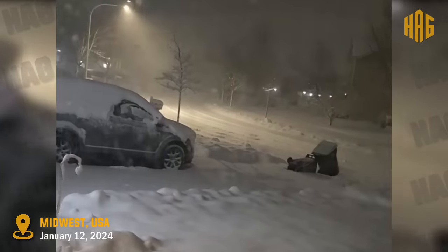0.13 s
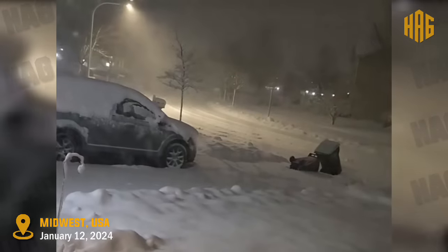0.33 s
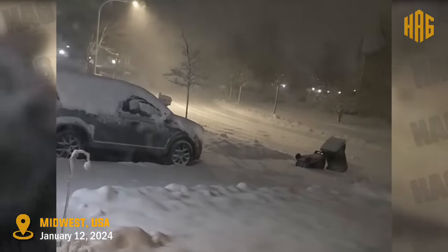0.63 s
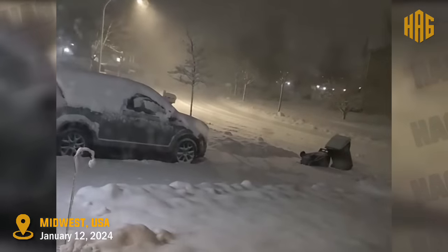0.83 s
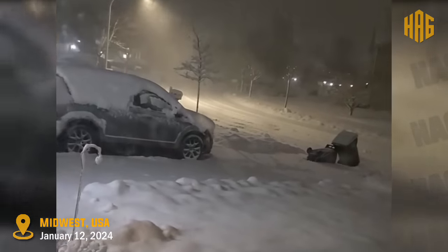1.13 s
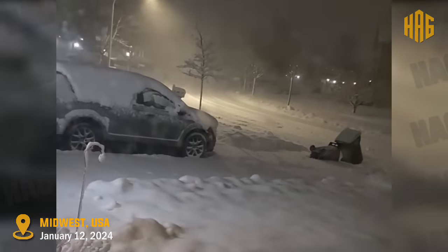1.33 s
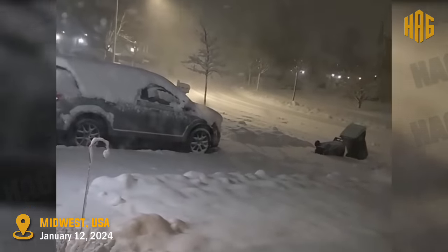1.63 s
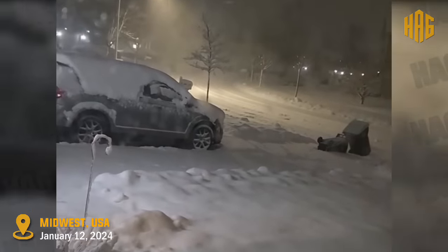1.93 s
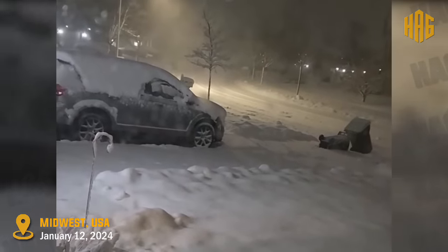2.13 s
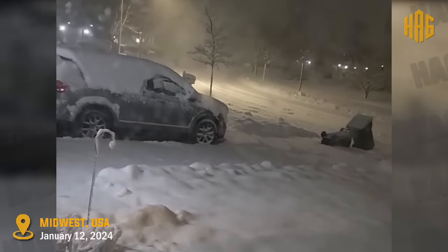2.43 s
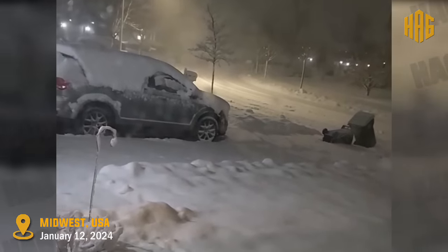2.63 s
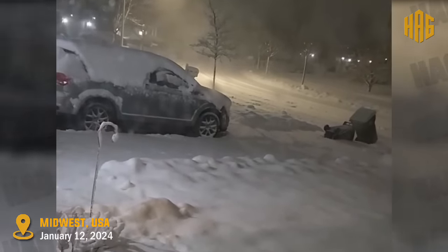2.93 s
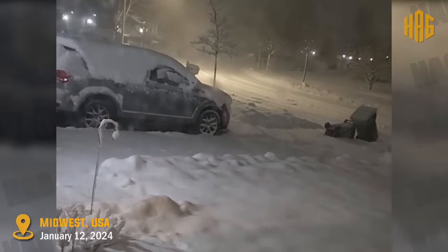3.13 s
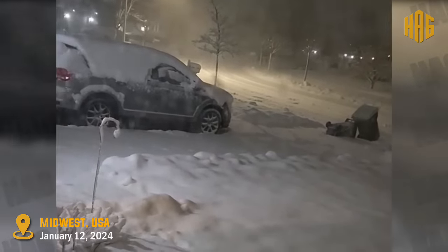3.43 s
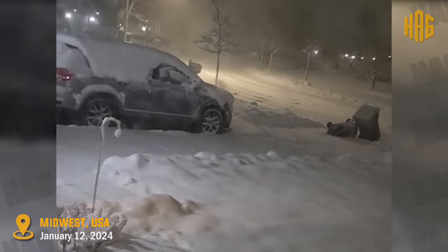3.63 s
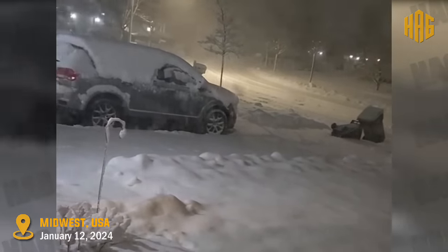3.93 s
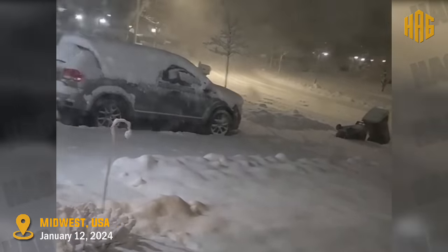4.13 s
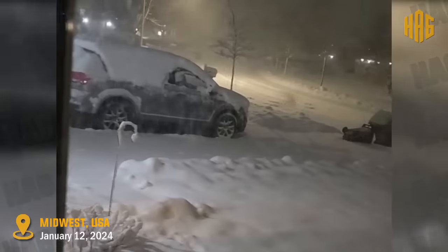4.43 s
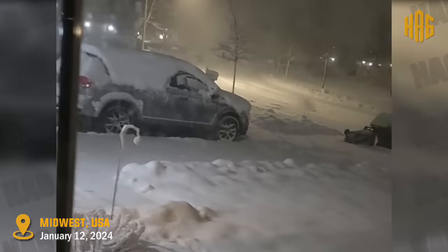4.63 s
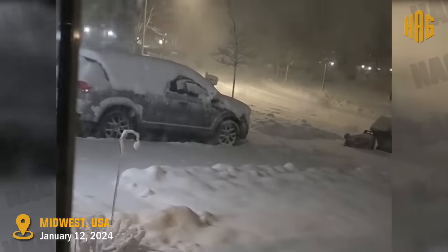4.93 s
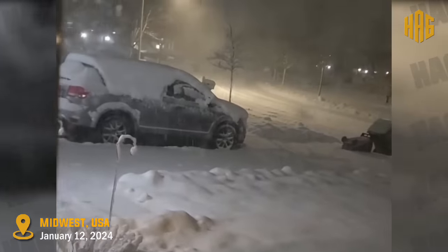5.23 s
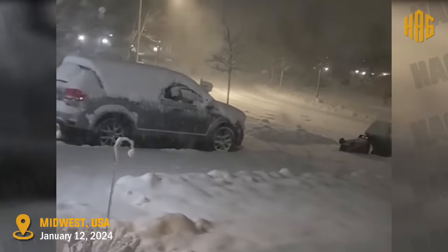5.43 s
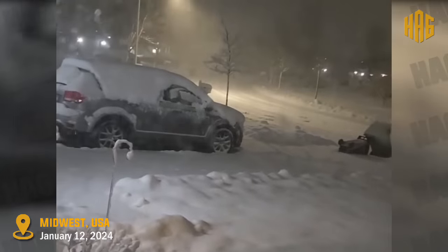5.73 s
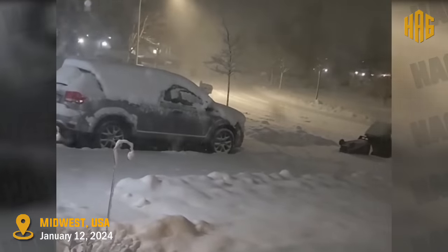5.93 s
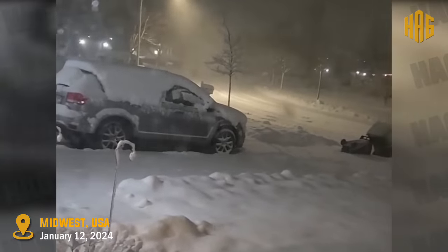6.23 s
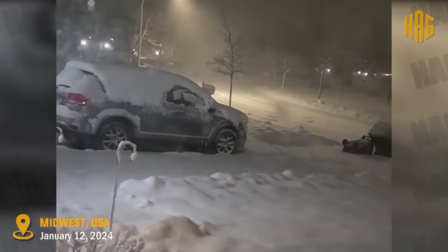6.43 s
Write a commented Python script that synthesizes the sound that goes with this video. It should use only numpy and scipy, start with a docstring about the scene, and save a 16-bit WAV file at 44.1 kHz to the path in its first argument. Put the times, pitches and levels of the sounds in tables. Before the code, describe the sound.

Muffled storm wind and a low fan hum heard indoors, with a nearby fabric rustle, light knocks and sharp ticks.

```python
"""A night blizzard rumbles outside a window and booms in the resonances of the room.
A motor, probably a heating fan, hums under it, and air moans in a gap. Fabric stirs faintly, then
brushes past close by, with a creak, a run of light knocks on a panel and a few sharp ticks.
Far behind, gusts of snow sizzle over a thin hiss. Wind and fabric are filtered noise,
the fan is a few wavering tones, and each knock is a click that sets the panel ringing."""
import sys
import numpy as np
from scipy import signal
from scipy.fft import rfft, irfft
from scipy.io import wavfile
from scipy.ndimage import uniform_filter1d

SR = 44100
rng = np.random.default_rng(int(sys.argv[2]) if len(sys.argv) > 2 else 0)


def inscribe(sig):
    """Save sig as 16-bit PCM at rate SR to the path in sys.argv[1].

    A 1-D sig is mono; a 2-D sig holds one channel per row.
    Samples are clipped to [-1, 1] before scaling.
    """
    pcm = np.round(np.clip(np.atleast_2d(sig).T, -1, 1) * 32767)
    wavfile.write(sys.argv[1], SR, pcm.astype(np.int16))


N = 289869
TIME, HZ = np.arange(N) / SR, np.fft.rfftfreq(N, 1 / SR)
# Table levels are in dB before each function's own gains. Balance is left minus right.

# The wind's tone. Each row: frequency in Hz, level in dB.
WIND_SPECTRUM = [(10, -83.5), (21, -78), (33, -64), (47, -68), (85, -61), (125, -66.5), (165, -63),
                 (205, -69), (275, -81), (385, -81), (455, -83.5), (790, -97), (930, -94), (1300, -103),
                 (2000, -122), (4000, -150)]
# The room's resonances. Each row: pitch in Hz, rough width in Hz, level in dB, balance in dB,
# left-right phase in radians.
ROOM_MODES = [(37, 6.1, -61.5, -2, -0.38), (78.2, 3.2, -64, -2, -0.75), (102.5, 10.6, -57, 2, -0.13),
              (132.7, 8.3, -56.5, -2, 0), (184.9, 16.8, -62.5, 5, 0.13), (234.5, 28.5, -60.5, -2, -0.02),
              (288.7, 3.35, -57, 1.5, 0.39), (306.3, 18.4, -62, 2.5, -1.3), (354, 16, -71.5, 0.5, 0.38),
              (360, 36, -69, 3.5, 1.46), (425.7, 11, -80, -6.5, 4.1), (553.6, 47, -86, 2, 1.8),
              (628.8, 16, -81, 5, 0.94), (741, 31, -86.5, 5.5, 2), (787, 18, -86.5, 5.5, 1.95),
              (836.6, 26, -94.5, 12, 0.5)]
# The strength of the storm and of its higher roar. Each row: time in seconds, level in dB.
STORM_LEVEL = [(0, -46.5), (.3, -47), (.7, -41), (1.02, -39), (1.3, -41.5), (1.52, -39.5), (1.8, -40),
               (2.25, -40.5), (2.43, -43.5), (2.62, -40), (3.3, -41), (4.1, -39), (5.1, -42), (5.7, -41.5),
               (6.15, -44), (6.35, -40), (6.57, -41)]
ROAR_LEVEL = [(0.1, -75), (.35, -64), (.5, -66.5), (.85, -64), (1.02, -69), (1.3, -60), (1.45, -66),
              (1.7, -64.5), (2.3, -64.5), (2.5, -66.5), (2.8, -62), (3.05, -67), (3.8, -65), (4.08, -63),
              (4.3, -64), (4.75, -62), (4.92, -65), (5.1, -64), (5.45, -61), (6.2, -63.5), (6.57, -62.5)]


def storm_rumble(split_hz=520):
    """Churning air shakes the room; a low rumble and a higher roar swell and waver separately."""
    spectrum = air_noise() * gain_of(along_spectrum(WIND_SPECTRUM))
    for hz, width, db, balance_db, phase in ROOM_MODES:
        push = rfft(rng.standard_normal(N)) * np.sqrt(SR / 2)
        mode = resonance(hz, width * np.sqrt(2)) ** 2
        spectrum += push * gain_of(db) * mode * pan(balance_db, phase)
    low_share = 1 / (1 + (HZ / split_hz) ** 10)
    rumble = irfft(spectrum * low_share, N) * swelling(STORM_LEVEL, depth=.72)
    roar = irfft(spectrum * (1 - low_share), N) * swelling(ROAR_LEVEL, depth=.93)
    return rumble * flutter(db=.57, rate_hz=10) + roar * flutter(db=1.5, rate_hz=6)


# The room's booms. Each row: peak time in seconds, length in seconds, level in dB, pitch in Hz.
BOOMS = [(0.994, 0.12, -46, 307.4), (1.55, .18, -47, 308.6), (2.626, 0.17, -45, 309.8),
         (2.793, 0.18, -64.5, 627.4), (4.072, 0.091, -62, 625), (4.91, 0.088, -41.5, 311),
         (5.132, 0.22, -44, 313.3)]


def room_booms():
    """Stronger gusts make one resonance of the room ring for a moment."""
    return sum(singing_noise(hz, width=12, steadiness=.7) * gain_of(db) * bell(s, length)
               for s, length, db, hz in BOOMS)


# The fan's tones. Each row: pitch in Hz, level in dB, pitch wander in Hz, balance in dB,
# left-right phase in radians.
FAN_TONES = [(120.17, -37.5, 0.089, 0.5, 0.04), (139, -49, 0.27, -0.5, 0.048), (250, -54.5, 0.3, -1.5, 1),
             (937, -82, 0.22, 0, 2.2)]
# The loudness of the hum. Each row: time in seconds, level in dB.
HUM_LEVEL = [(0, -29.5), (.1, -55), (.2, -37.5), (.33, -41.5), (.5, -36.5), (1.1, -34.5), (1.2, -47),
             (1.27, -33.5), (1.92, -38.5), (2.14, -32), (2.22, -42.5), (2.28, -35.5), (2.7, -38),
             (3.46, -33), (3.77, -37.5), (4.15, -36), (5.0, -37.5), (5.44, -33), (5.87, -36.5),
             (6.25, -34.5), (6.57, -37.5)]


def fan_hum(waver_db_per_hz=2.5):
    """The mains hum nearly holds its pitch, the turning parts wander more, and all flutter in level."""
    out = np.zeros((2, N))
    for hz, db, wander, balance_db, phase in FAN_TONES:
        turns = np.cumsum(hz + wander * drift(rate_hz=2)) / SR + rng.random()
        height = np.sqrt(2) * gain_of(db) * flutter(waver_db_per_hz * wander, rate_hz=1.3)
        out += (height * np.exp(2j * np.pi * turns) * pan(balance_db, phase)).real
    return out * swelling(HUM_LEVEL, depth=1) * flutter(db=1.47, rate_hz=9)


# Dips in the throb. Each row: time of the low point in seconds, length in seconds, depth in dB.
LULLS = [(0, 0.29, 13), (1.115, 0.32, 6.5), (2.355, 0.43, 10), (3.852, 0.22, 10), (4.998, 0.44, 7),
         (6.43, 0.93, 3.5)]


def shaft_throb(shaft_hz=56.9, wander_hz=.69, level_db=-42):
    """The fan's shaft makes a deep, wavering tone that now and then sinks into a lull."""
    turns = np.cumsum(shaft_hz + wander_hz * drift(rate_hz=2.7)) / SR + rng.random()
    waver = unit_rms(1 + .36 * drift(rate_hz=4))
    lull_db = sum(depth_db * bell(s, length) for s, length, depth_db in LULLS)
    return np.sqrt(2) * np.sin(2 * np.pi * turns) * gain_of(level_db - lull_db) * waver


# The gap's upper and lower note. Each row: pitch in Hz, rough width in Hz.
GAP_NOTES = [(484, 16.8), (364.3, 4.9)]
# The moan's swells. Each row: peak time in seconds, length in seconds, upper and lower level in dB.
MOANS = [(.44, 0.11, -55.5, -45.5), (1.4, 0.26, -57, -52), (2.1, 0.32, -57, -56.5), (2.4, 0.28, -57, -55),
         (2.9, 0.11, -65.5, -48), (3.82, 0.11, -52, -49.5), (4.42, 0.18, -58, -46.5),
         (4.92, 0.28, -58, -62), (5.3, 0.27, -56, -43.5), (5.72, 0.099, -52, -49.5),
         (6.1, 0.21, -53, -45.5)]


def gap_moan(base_db=-61.5, swell_db=-4.5):
    """Air in a gap sings a note that follows the storm; in each swell it grows and a lower one joins."""
    upper, lower = (singing_noise(hz, width, steadiness=.35) for hz, width in GAP_NOTES)
    steady = upper * gain_of(base_db) * swelling(STORM_LEVEL, depth=.95)
    surges = upper * swells(MOANS) + lower * swells(MOANS, column=3)
    return steady + gain_of(swell_db) * surges


# The resonances of a light panel. Each row: pitch in Hz, rough width in Hz, level in dB.
PANEL_MODES = [(1392, 480, -1), (1590, 350, 1), (2020, 430, -10), (3230, 370, -27), (3720, 370, -19.5),
               (4750, 260, -24)]


def panel_response():
    """The panel rings briefly at several pitches, added with alternating signs."""
    return sum((-1) ** k * gain_of(db) * resonance(hz, width) ** 2
               for k, (hz, width, db) in enumerate(PANEL_MODES))


# Knocks on the panel. Each row: time in seconds, ring level in dB, pitch multiplier,
# rattle level in dB, scrape level in dB, balance in dB.
KNOCKS = [(0.148, -60, 0.83, -12, -87, -5), (0.287, -59, 0.68, 0, -80, -7), (.725, -57, 0.93, -5, -82, 0),
          (1.333, -58, 1.2, -9, -80, 7), (3.132, -52.5, 0.92, -11, -79, -4),
          (4.119, -47, 1.3, -14, -62, -4), (4.3591, -34.5, 1.09, -14, -55.5, -7.5),
          (4.39, -41, 1.06, -9, -55.5, -9), (4.4174, -38.5, 1.02, -25, -64, -13.5),
          (4.4675, -37.5, 1.08, -20, -54.5, -9), (4.493, -42, .96, -15, -55, -3),
          (4.507, -46, 1.4, -8, -66, -2), (4.537, -35.5, 0.94, -17, -64, -11.5),
          (4.6283, -35.5, 1.01, -7, -55.5, -5.5), (4.751, -43, 0.93, -9, -74, -8),
          (4.764, -33, 1.06, -18, -66, -11.5), (4.772, -40.5, 1, -5, -55.5, -1),
          (4.8548, -37.5, 1.03, -10.5, -78, -9), (4.92, -49, 0.96, -10, -79, -12),
          (5.556, -54, 1.02, 1, -73, 5), (5.772, -52, 0.91, -6, -60.5, -2)]


def panel_knocks(level_db=-2, chatter_db=-35):
    """Each blow rattles and scrapes the panel, ringing it at a pitch set by where it lands."""
    out = np.zeros((2, N))
    ring = irfft(panel_response() * pan(0, phase=2.04), N)[:, :1024]
    ring /= abs(ring).max()
    ring_age = TIME[:ring.shape[1]]
    for s, ring_db, pitch, rattle_db, scrape_db, balance_db in KNOCKS:
        span, age, envelope = contact(s, rise=.005, decay=.005)
        chatter = gain_of(chatter_db) * envelope * rng.standard_normal((2, len(age)))
        force = chatter + gain_of(rattle_db) * rattle(age)
        force[:, np.argmin(abs(age))] += 1  # the blow itself
        tuned = np.array([np.interp(ring_age * pitch, ring_age, side) for side in ring])
        body = gain_of(ring_db) * signal.fftconvolve(force, tuned, axes=1)[:, :len(age)]
        slips = gain_of(scrape_db) * scrape(envelope, hz=3770, width=1300)
        out[:, span] += gain_of(level_db) * (body + slips) * pan(balance_db).real
    return out


def rattle(age, gap_s=.0036, fall_db=4.5):
    """The loose panel taps once just before the blow, then five times after it, fading away."""
    out = np.zeros(len(age))
    for k in (-1, 1, 2, 3, 4, 5):
        at = gap_s * (k + rng.uniform(-.25, .25))
        out[np.argmin(abs(age - at))] += rng.choice([-1, 1]) * gain_of(-fall_db * (abs(k) - 2.5))
    return out


# Ticks and scrapes. Each row: time in seconds, level in dB, pitch in Hz, rough width in Hz,
# rise in seconds, decay in seconds, balance in dB.
SNAGS = [(.148, -58.5, 2000, 4000, 0.00064, .0018, -4), (0.159, -72.5, 3500, 6000, .008, .016, 5),
         (.285, -69, 3230, 7100, 0.0035, 0.013, 0), (1.091, -71, 3000, 6000, .0006, .005, 0),
         (2.083, -81.5, 5860, 2510, .015, 0.019, 16), (3.885, -71, 5300, 1500, 0.0088, 0.033, 8),
         (4.171, -55, 5230, 9500, 0.0045, 0.0074, -17), (4.4285, -59, 7000, 5000, .0004, .0015, -5),
         (4.479, -52, 4630, 3020, .013, 0.01, -12), (4.778, -59, 7340, 1500, 0.0056, 0.01, 4),
         (5.5104, -41.5, 3770, 3800, 0.00015, 0.001, 4), (5.5107, -51, 7600, 1300, 0.00023, 0.0009, 9),
         (5.5167, -50, 4600, 4000, .0003, .001, 5), (5.551, -51.5, 4200, 4500, 0.0013, 0.0067, -5),
         (5.5585, -51.5, 5200, 6000, 0.00087, 0.0067, -7), (5.56, -52, 7600, 700, .001, 0.0032, 2),
         (5.909, -61.5, 5200, 7000, .004, 0.0079, -6), (6.521, -64, 5000, 6000, .0004, .002, 3)]


def fabric_snags(level_db=-2):
    """The fabric catches and lets go: a burst of slips with no blow behind it."""
    out = np.zeros((2, N))
    for s, db, hz, width, rise, decay, balance_db in SNAGS:
        span, _, envelope = contact(s, rise, decay)
        out[:, span] += gain_of(level_db + db) * scrape(envelope, hz, width) * pan(balance_db).real
    return out


# The tone of sliding fabric. Each row: frequency in Hz, level in dB.
FABRIC_SPECTRUM = [(500, -24), (1100, -1), (1800, 0), (2400, 0.5), (3250, -4), (3900, -1), (4300, -2),
                   (4700, 1), (5200, 1), (5850, -1.5), (6350, 1), (6900, 0), (7700, 3), (8800, -4),
                   (10500, -9), (16000, -14)]
# One long brush. Each row: time in seconds, fizz level in dB, rub level in dB.
BRUSH = [(3.78, -100, -102), (3.88, -76.5, -84), (4.0, -70.5, -75), (4.15, -60, -66), (4.3, -66, -64),
         (4.46, -58, -56.5), (4.58, -64.5, -61.5), (4.75, -59.5, -62.5), (5.02, -69, -72), (5.29, -63, -72),
         (5.57, -66.5, -85), (5.68, -75, -90), (5.92, -71, -87), (6.15, -96, -96)]
# Faint stirs. Each row: peak time in seconds, length in seconds, fizz level in dB, rub level in dB.
STIRS = [(.38, 0.069, -75.5, -84), (.63, 0.33, -100, -77), (1.53, 0.11, -90, -73), (2.7, 0.52, -104, -78.5),
         (3.55, 0.095, -104, -79), (6.52, 0.14, -76, -82.5)]


def fabric_brush(fizz_db=1.5, rub_db=-1, snaps_db=-5.5, echo_s=.0021, echo_share=.35):
    """Fibres catch and slip: a bright fizz with small snaps, and a duller, clumpy rub on the panel."""
    slips = rng.standard_normal((2, N)) * unit_rms(flutter(db=.5, rate_hz=2700))
    clumps = unit_rms(flutter(db=3, rate_hz=51))
    fibres = filtered(shimmer(slips, depth_db=3.7), gain_of(along_spectrum(FABRIC_SPECTRUM)))
    fibres += gain_of(snaps_db) * fibre_snaps()
    echo = 1 + echo_share * np.exp(-2j * np.pi * HZ * echo_s)  # off a nearby surface
    fizz = unit_rms(filtered(fibres, echo)) * pan(balance_db=-1).real
    rub = filtered(slips * clumps, panel_response()) * pan(balance_db=-5).real
    speed = gain_of(along_time(BRUSH)) + swells(STIRS)
    pressure = gain_of(along_time(BRUSH, column=2)) + swells(STIRS, column=3)
    return fizz * gain_of(fizz_db) * speed + rub * gain_of(rub_db) * pressure


def fibre_snaps(per_second=260, spread_db=4, pitches=8):
    """Single fibres snap at random, each ringing briefly at one of several pitches."""
    out, age = np.zeros((2, N)), TIME[:256]
    for hz in np.geomspace(2200, 8500, pitches):
        sizes = gain_of(spread_db * np.minimum(rng.exponential(1, (2, N)), 3))
        snapped = rng.random((2, N)) < per_second / pitches / SR
        ping = np.sin(2 * np.pi * hz * age) * np.exp(-hz * age / 2)
        out += signal.oaconvolve(sizes * snapped, ping[None], axes=1)[:, :N]
    return unit_rms(out)


# The fabric's creaks. Each row: peak time in seconds, length in seconds, level in dB.
CREAKS = [(4.02, .06, -72), (4.125, 0.024, -53), (4.18, 0.059, -58), (4.265, 0.052, -64)]


def fabric_creak():
    """Quick slips keep the panel ringing at one pitch."""
    ringing = np.array([singing_noise(hz=1464, width=80, steadiness=.3) for _ in range(2)])
    return ringing * swells(CREAKS) * pan(balance_db=-6).real


# Faint squeaks. Each row: peak time in seconds, length in seconds, level in dB, pitch in Hz.
SQUEAKS = [(0.291, .025, -69, 1365), (0.296, .022, -68.5, 1980), (0.366, 0.033, -58.5, 1375),
           (0.38, 0.028, -66.5, 1930), (0.514, .05, -78, 2120), (.66, .05, -77, 2090),
           (3.878, 0.013, -65, 5350)]


def fabric_squeaks():
    """The fabric slips regularly for a moment, at one pitch."""
    out = np.zeros((2, N))
    for s, length, db, hz in SQUEAKS:
        span = slice(round((s - .1) * SR), round((s + .1) * SR))
        slips = scrape(np.ones(span.stop - span.start), hz, width=.089 * hz)
        out[:, span] += gain_of(db) * steadied(slips, steadiness=.4) * bell(s, length)[span]
    return out * pan(balance_db=-2).real


# The tone of the hiss. Each row: frequency in Hz, level in dB.
HISS_SPECTRUM = [(400, -24.5), (1000, -4.5), (1450, 8), (1780, -3.5), (2150, 2), (3000, -5.5), (4500, -5),
                 (6600, -11), (7800, -10), (8400, -14), (10400, -18.5), (12500, -15), (16000, -18)]
# The loudness of the hiss. Each row: time in seconds, level in dB.
HISS_LEVEL = [(0, -80), (.4, -74.5), (1.15, -72.5), (1.6, -72.5), (2.15, -75.5), (2.7, -74), (3.3, -74.5),
              (3.9, -75), (6.57, -73.5)]
# Gusts of blown snow. Each row: peak time in seconds, length in seconds, level in dB.
GUSTS = [(.5, 0.67, -87.5), (1.16, 0.2, -80), (1.46, 0.16, -78.5), (3.19, 0.16, -84), (5.99, 0.17, -81.5),
         (6.23, 0.12, -79.5), (6.54, 0.39, -81)]


def snow_hiss(calm_db=-97):
    """A thin, restless hiss, with blown snow sizzling on top in the gusts."""
    noise = irfft(air_noise() * gain_of(along_spectrum(HISS_SPECTRUM)), N)
    hiss = shimmer(noise, depth_db=2.7) * gain_of(along_time(HISS_LEVEL))
    sizzle = filtered(rng.standard_normal((2, N)), resonance(hz=7850, width=1300) ** 2)
    sizzle *= gain_of(calm_db) + swells(GUSTS)
    return (hiss + sizzle) * pan(balance_db=3).real * flutter(db=1.06, rate_hz=30)


# How alike left and right are. Each row: frequency in Hz, likeness from -1 (opposite) to 1 (same).
STEREO_LIKENESS = [(60, 1), (130, 0.96), (290, 0.88), (640, 0.16), (1400, -0.42), (3000, 0.072),
                   (15000, 0.15)]


def air_noise():
    """Spectra of left and right white noise, alike in the bass and mostly unrelated in the treble."""
    mid, side = rfft(rng.standard_normal((2, N))) * np.sqrt(SR / 2)
    likeness = np.clip(along_spectrum(STEREO_LIKENESS), -1, 1)
    mid *= np.sqrt((1 + likeness) / 2)
    side *= np.sqrt((1 - likeness) / 2)
    return np.array([mid + side, mid - side])


def contact(s, rise, decay, tail_db=-24, tail_s=.098):
    """One short touch: its samples, their age, and a loudness curve with a quick peak and faint tail."""
    span = slice(round((s - .03) * SR), round((s + .12) * SR))
    age = TIME[span] - s
    after = np.maximum(age, 0)
    fade = np.exp(-after / decay) + gain_of(tail_db) * np.exp(-after / tail_s)
    return span, age, np.exp(np.minimum(age, 0) / rise) * fade


def scrape(envelope, hz, width):
    """Many tiny slips: one band of noise under a loudness curve."""
    b, a = signal.iirpeak(hz, hz / min(width, SR / 3), fs=SR)
    slips = rng.standard_normal((2, len(envelope)))
    return envelope * unit_rms(signal.lfilter(b, a, signal.lfilter(b, a, slips)))


def singing_noise(hz, width, steadiness):
    """Noise held in one narrow resonance, heard as a wavering note."""
    return steadied(filtered(rng.standard_normal(N), resonance(hz, width) ** 2), steadiness)


def steadied(x, steadiness):
    """Evens out the loudness of x: 0 not at all, 1 fully."""
    loudness = abs(signal.hilbert(x))
    return unit_rms(x / (loudness + 1e-6) ** steadiness)


def shimmer(x, depth_db):
    """Narrow patches of the spectrum swell and fade within about a tenth of a second."""
    frames = signal.stft(x, nperseg=1024, noverlap=768)[2]
    patches = uniform_filter1d(rng.standard_normal(frames.shape[1:]), size=6, axis=0)  # over pitch
    patches = unit_rms(uniform_filter1d(patches, size=16, axis=1))  # over time
    frames *= gain_of(depth_db * patches)
    return unit_rms(signal.istft(frames, nperseg=1024, noverlap=768)[1][:, :N])


def resonance(hz, width):
    """A filter that passes a band `width` Hz wide around hz."""
    return 1j * HZ * width / (hz ** 2 - HZ ** 2 + 1j * HZ * width)


def filtered(x, response):
    """Filters x, scaled so that white noise keeps its power."""
    return irfft(rfft(x) * response / np.sqrt(np.mean(abs(response) ** 2)), N)


def drift(rate_hz):
    """A smooth random curve of typical size 1."""
    return unit_rms(irfft(rfft(rng.standard_normal(N)) * np.exp(-(HZ / rate_hz) ** 2) * (HZ > 0), N))


def flutter(db, rate_hz):
    """A gain that wavers at random by about db."""
    return gain_of(db * drift(rate_hz))


def bell(s, length):
    """A bump of height 1 at time s, `length` seconds wide at half height."""
    return .5 ** ((2 * (TIME - s) / length) ** 2)


def swells(rows, column=2):
    """A gain with one bump for each row, its dB taken from one column."""
    return sum(gain_of(row[column]) * bell(row[0], row[1]) for row in rows)


def swelling(rows, depth):
    """A gain that follows a level curve around its middle value; depth scales the swings."""
    db = along_time(rows)
    return gain_of(depth * (db - np.median(db)))


def along_time(rows, column=1):
    """A table's value at every sample."""
    rows = np.asarray(rows)
    return np.interp(TIME, rows[:, 0], rows[:, column])


def along_spectrum(rows):
    """A table's value at every frequency."""
    hz, value = np.transpose(rows)
    return np.interp(np.log(HZ + 1), np.log(hz + 1), value)


def pan(balance_db, phase=0):
    """Left and right gains that differ by a level and a phase."""
    side = np.array([[.5], [-.5]])
    return gain_of(side * balance_db) * np.exp(1j * side * phase)


def gain_of(db):
    """Turns dB into a multiplier."""
    return 10 ** (np.asarray(db) / 20)


def unit_rms(x):
    """Scales x to an average power of 1."""
    return x / np.sqrt(np.mean(x ** 2) + 1e-20)


def scene():
    """The storm and the fan, with the fabric and its knocks close by."""
    room = storm_rumble() + room_booms() + gap_moan() + fan_hum() + shaft_throb() + snow_hiss()
    return room + fabric_brush() + fabric_creak() + fabric_squeaks() + panel_knocks() + fabric_snags()


def record(dry):
    """Cuts the treble steeply above 15750 Hz."""
    lowpass = signal.firwin(2001, 15750, window=("kaiser", 9), fs=SR)
    return signal.oaconvolve(dry, lowpass[None], "same", axes=1)


dry = scene()
out = record(dry)
inscribe(out)
```